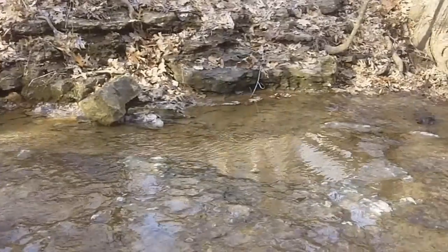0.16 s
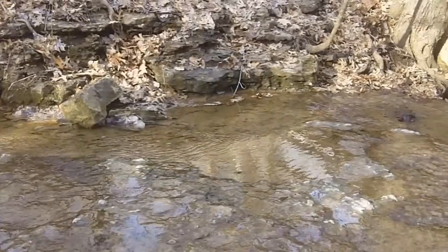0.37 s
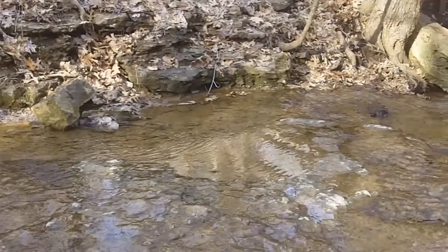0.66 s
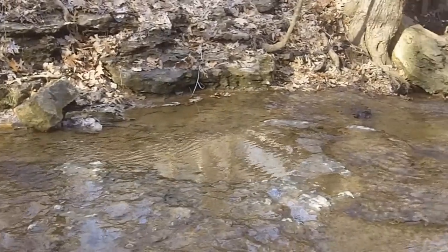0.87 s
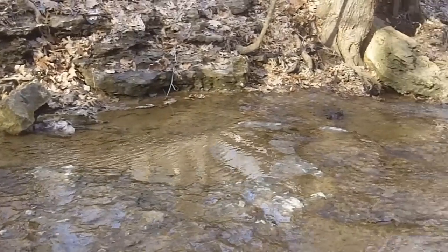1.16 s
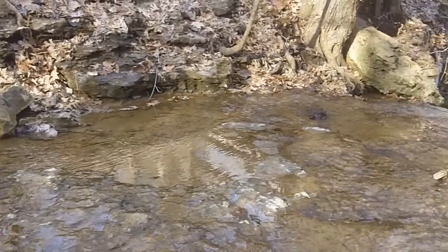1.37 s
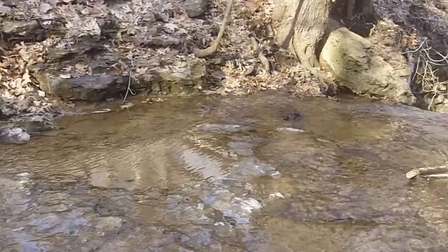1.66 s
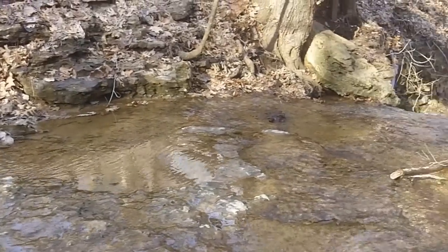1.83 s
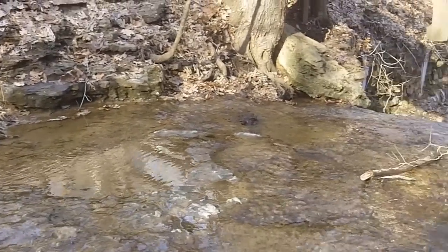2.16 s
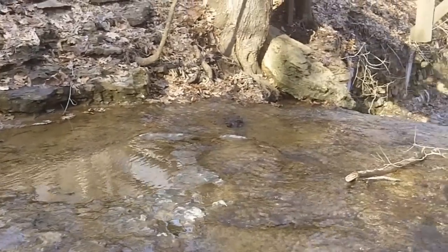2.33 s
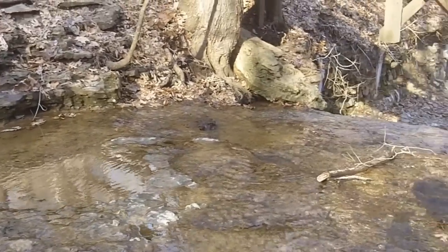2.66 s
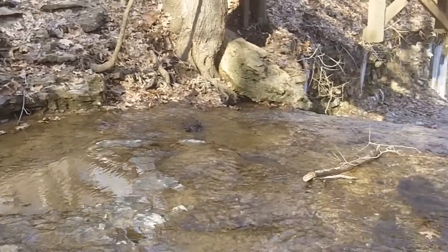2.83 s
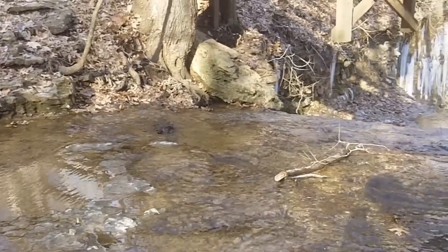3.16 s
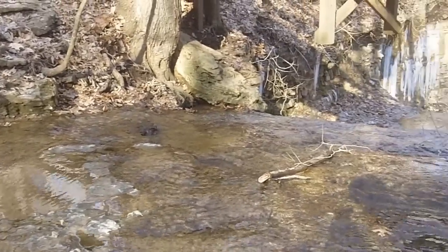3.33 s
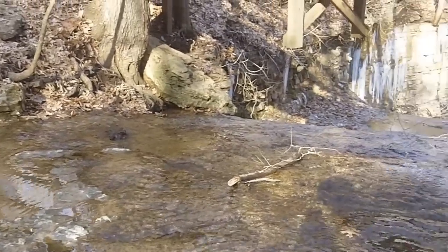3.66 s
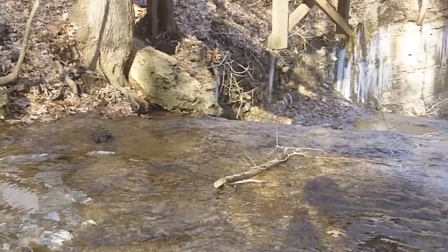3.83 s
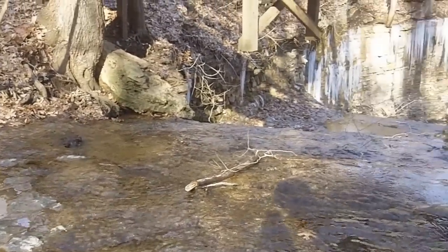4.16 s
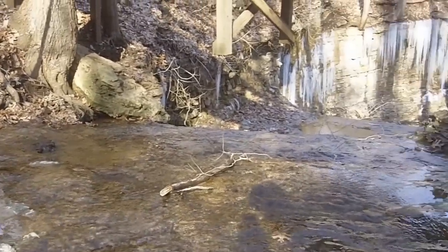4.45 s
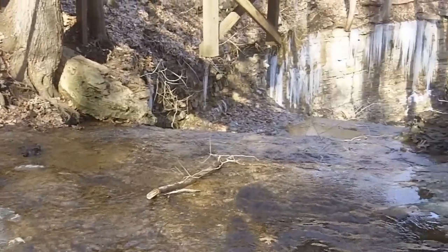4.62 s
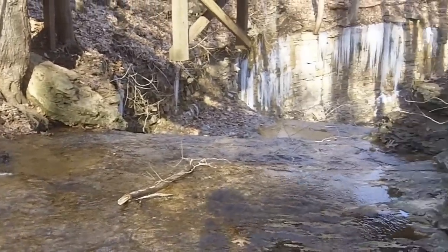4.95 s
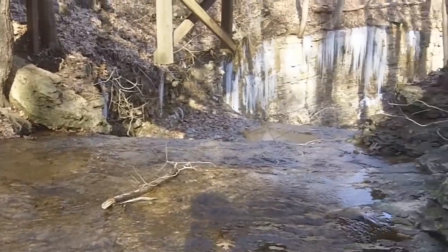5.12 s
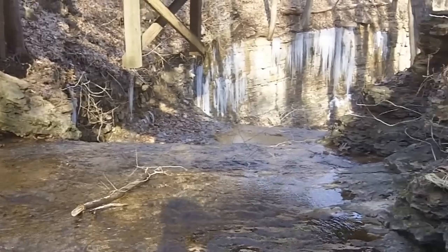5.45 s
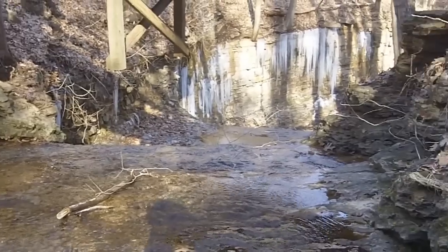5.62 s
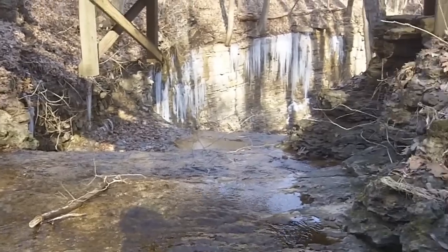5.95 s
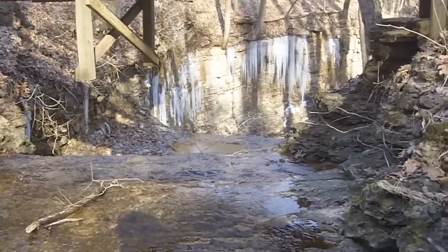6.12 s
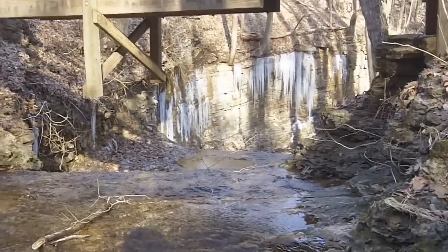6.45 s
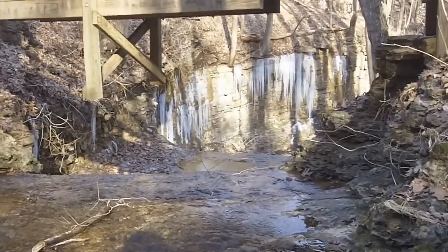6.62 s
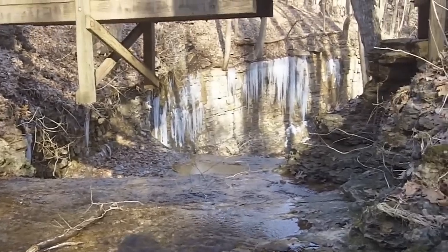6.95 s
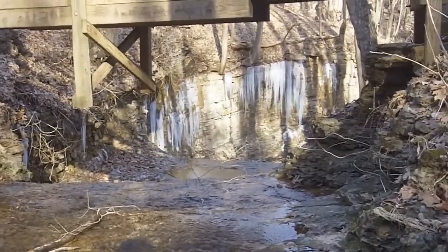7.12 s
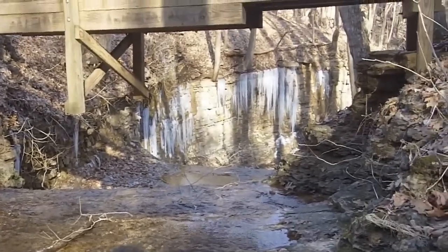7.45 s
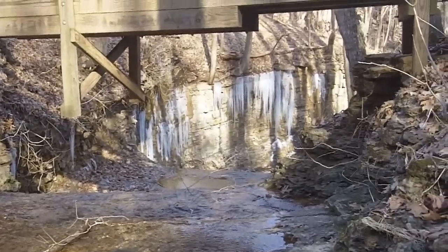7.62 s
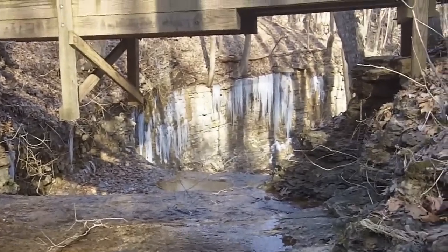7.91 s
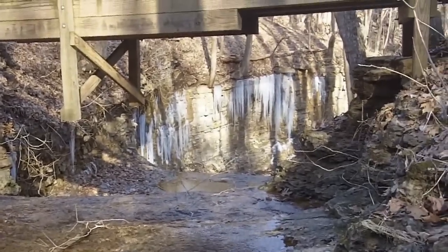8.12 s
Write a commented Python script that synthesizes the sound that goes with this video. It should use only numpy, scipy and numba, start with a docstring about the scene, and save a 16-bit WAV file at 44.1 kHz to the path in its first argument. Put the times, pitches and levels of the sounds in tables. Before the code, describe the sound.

Close, bright trickling and gurgling of a shallow stream over stones continues throughout, dotted with little plops and drips against a soft wash of water. Light wind rumbles on the microphone, held outdoors at the water's edge. Before the middle, a hand rubs and bumps the camera softly, with a single click among the knocks. The gurgle thins slightly and the babbling carries on unchanged.

```python
"""On the bank of a shallow creek that runs over rock ledges, heard through a hand-held camera.
Thousands of trapped air bubbles ring as damped oscillators over the even rush of the water
further off; spray ticks close by. Moving air rumbles on the microphone, and the camera body,
set vibrating by the hand, knocks softly and clicks once as it is turned."""
import sys
import numpy as np
from scipy import signal
from scipy.fft import rfft, next_fast_len
from scipy.io import wavfile
from scipy.ndimage import map_coordinates
from numba import njit

SR = 44100
rng = np.random.default_rng(int(sys.argv[2]) if len(sys.argv) > 2 else 0)


def output_pcm(signal):
    """Save a mono or channel-first signal as 16-bit PCM at the path in sys.argv[1].

    Samples are clipped to [-1, 1] before scaling.
    """
    pcm = np.clip(np.atleast_2d(signal).T, -1, 1) * 32767
    wavfile.write(sys.argv[1], SR, np.round(pcm).astype(np.int16))


N = 365009
T = np.arange(N) / SR
TURN_S = (2.34, 3.11)  # start and end of the camera's turn away from the near riffle


def babble(count, spread_db, cycles, glide, burst_s, burst_db):
    """Minnaert resonance: each folding wavelet traps a few bubbles, and the smaller ones ring higher."""
    # Loudness by bubble size. Each row: pitch in Hz, relative level in dB.
    sizes = [(330, -36), (440, -7), (600, -4), (1000, -2), (1800, 1), (2500, -0.5), (3600, 1), (4800, -0.5),
             (7500, -8.5)]
    # The babble varies as the camera faces the distant water. Each row: time in seconds, gain in dB.
    facing = [(0, 1.3), (4.5, 2.5), (6, 0.5), (8.28, 1.1)]
    per_wavelet, lowest_hz, highest_hz = 6, sizes[0][0], sizes[-1][0]
    fold_s, strength = rng.random(count) * N / SR, rng.standard_normal(count)
    delay, pitch, near, life, rise = rng.random((count * per_wavelet, 5)).T
    start = fold_s.repeat(per_wavelet) + burst_s * delay
    hz = lowest_hz + (highest_hz - lowest_hz) * pitch ** 1.9
    nearness = np.minimum(-np.log(1 - near), 3.5)  # a few are much nearer than the rest
    wavelet_db = burst_db * np.tanh(strength).repeat(per_wavelet)
    peak = gain_at(sizes, hz) * undb(spread_db * nearness + wavelet_db)
    ring_cycles = cycles * np.sqrt(hz / 1000) * (.5 + life)  # small bubbles ring for more cycles
    bubbles = ring(start, peak, hz, ring_cycles, glide * (rise - .2), swell=.47)
    return level(bubbles, -40) * envelope(facing)


def plops(gain_db, glide):
    """Free oscillation: single near bubbles stand out, each with a rounded start and an upward chirp."""
    # Each row: start in seconds, relative peak level in dB, pitch in Hz, ring length in cycles.
    nearest_bubbles = [(0.064, -31, 1210, 30), (0.1012, -26.5, 2600, 40), (0.133, -30, 1440, 45),
                       (0.196, -33, 626, 25), (0.4835, -22, 3340, 12), (0.517, -31, 1020, 35),
                       (0.581, -26, 3650, 18), (0.624, -30, 1060, 22), (0.829, -30, 1490, 75),
                       (1.0139, -30.0, 2220, 60), (1.082, -22, 960, 34), (1.1972, -27, 2660, 18),
                       (1.21, -29.5, 985, 30), (1.6463, -26.5, 1060, 40), (1.6836, -28.5, 1620, 55),
                       (1.864, -33, 1165, 35), (2.034, -33, 1440, 35), (2.047, -33, 1010, 40),
                       (2.103, -27, 3260, 18), (2.2259, -23, 1890, 11), (2.413, -31.5, 540, 29),
                       (2.5592, -26.0, 3050, 27), (2.611, -28.5, 1680, 40), (2.652, -29, 1450, 42),
                       (2.784, -26, 3100, 14), (2.7973, -23, 2910, 8.7), (2.957, -29.5, 1290, 50),
                       (3.3043, -28, 3080, 40), (3.3811, -23, 3830, 13), (3.3845, -19, 1500, 8.4),
                       (3.4158, -20, 3920, 18), (3.4447, -26.5, 1580, 16), (4.004, -30, 565, 32),
                       (4.1034, -25, 4840, 37), (4.1229, -23, 4900, 27), (4.2231, -28.5, 2740, 45),
                       (4.2239, -22, 4960, 15), (4.3116, -27.5, 2850, 65), (4.4514, -28, 4880, 12),
                       (4.534, -30, 870, 28), (4.581, -30.0, 2760, 51), (4.6463, -28, 1130, 27),
                       (4.8748, -25.5, 1120, 27), (4.893, -23.5, 3970, 8), (4.9566, -31, 437, 7.8),
                       (4.9965, -28.5, 2600, 40), (5.502, -27, 3220, 40), (5.5034, -29.0, 2000, 71),
                       (5.88, -29, 1320, 33), (6.272, -31, 980, 30), (6.3995, -24.5, 4290, 37),
                       (6.408, -25.5, 1470, 12), (6.4966, -29, 4810, 27), (6.9228, -21.5, 2350, 24),
                       (7.0979, -25.5, 3740, 12), (7.5426, -25, 4900, 40), (7.6278, -31.5, 976, 44),
                       (7.9408, -27, 935, 35), (7.9874, -28, 4700, 40), (8.0033, -26, 4700, 18),
                       (8.0863, -25, 4700, 18), (8.1548, -24, 1220, 40)]
    start, db, hz, cycles = np.array(nearest_bubbles, float).T.copy()
    return ring(start, undb(db + gain_db), hz, cycles, np.full(len(start), glide), swell=1.2)


def gurgle(count, cycles):
    """Size sets resonance: each hollow between stones traps like-sized bubbles, so keeps near one pitch."""
    # Each row: pitch in Hz, pitch scatter as a fraction, levels in dB before and after the turn.
    hollows = [(666, 0.04, -50.5, -70), (1072.6, .09, -51.5, -51), (1693, .07, -54.5, -65)]
    out = np.zeros(N)
    for centre_hz, scatter, ahead_db, away_db in hollows:
        start = rng.random(count) * N / SR
        hz = centre_hz * np.exp(scatter * rng.standard_normal(count))
        peak = .3 + rng.random(count) ** 2
        ring_cycles = np.full(count, cycles * np.sqrt(centre_hz / 1000))
        glugs = ring(start, peak, hz, ring_cycles, glide=np.full(count, .08), swell=.6)
        out += level(glugs, np.interp(T, TURN_S, [ahead_db, away_db]))
    return out


def spray(count, ahead_db, away_db, spread_db, close_db, close_hz, close_cycles):
    """Drop impact: brief, high ticks on the surface, as a few close drops and a fine patter."""
    # The closest drops. Each row: start in seconds, relative peak level in dB.
    drops = [(.4100, -30), (.4716, -30), (1.2520, -31), (1.7732, -29), (2.194, -26), (2.568, -30),
             (2.7062, -23), (2.7835, -32), (2.8740, -28), (2.9577, -31), (3.0784, -30), (3.4158, -34),
             (3.8625, -28.5), (3.9551, -31.5), (4.5661, -29.5), (5.2271, -35), (5.9045, -31), (6.1412, -33),
             (6.1845, -34), (6.5845, -32), (6.6731, -34), (7.3338, -29.5), (7.6374, -28.5), (7.9820, -26.5),
             (8.0022, -30), (8.0122, -34)]
    when, pitch, near, life = rng.random((count, 4)).T
    peak = undb(spread_db * np.minimum(-np.log(1 - near), 3))
    patter = ring(when * N / SR, peak, 3600 + 3900 * pitch, 10 + 22 * life, np.zeros(count), swell=.8)
    start, db = np.array(drops, float).T.copy()
    hz = close_hz * (1 + .04 * rng.standard_normal(len(drops)))
    cycles = np.full(len(drops), close_cycles)
    close = ring(start, undb(db + close_db), hz, cycles, glide=np.zeros(len(drops)), swell=1.2)
    return close + level(patter, np.interp(T, TURN_S, [ahead_db, away_db]))


def rush():
    """Incoherent summation: distant bubbles, too many to tell apart, merge into gently surging noise."""
    # Each row: frequency in Hz, relative spectral density in dB.
    spectrum = [(100, -4.5), (200, -2), (330, 1), (450, -0.5), (620, 3), (1000, 1.5), (1800, 3),
                (2500, 0.5), (3600, 1), (4700, -2), (6500, -7), (7500, -14)]
    return noise(spectrum) * undb(-36.5 + .31 * walk(rate_hz=14))


def ledges(sound, wet_db, t60):
    """Diffuse reflection: the rock banks scatter each sound back as a short, dense tail."""
    t = T[:SR // 4]
    tail = rng.standard_normal(len(t)) * np.exp(-np.log(1000) * t / t60) * (t > .004)
    return sound + undb(wet_db) * signal.oaconvolve(sound, tail / np.linalg.norm(tail))[:N]


def knocks(push_db, body_db):
    """Elastic rebound: each push of the hand dents the casing, and the body springs back with a thud."""
    # Each row: time in seconds, relative level in dB, contact time in seconds.
    pushes = [(2.373, -27.5, .0014), (2.444, -28, 0.0021), (2.8525, -20, 0.0011), (2.8846, -18.5, 0.00079),
              (2.8945, -11, 0.00048), (2.912, -19, 0.0024), (2.9475, -22.5, 0.0014),
              (3.1051, -15.5, 0.00095), (3.14, -22, 0.00064), (3.4972, -12, 0.00039),
              (3.507, -21.5, 0.00049), (3.5144, -13.5, 0.00054), (3.658, -22, 0.0012),
              (3.7301, -23.5, 0.00081), (3.866, -20.5, 0.001), (4.0590, -12.5, 0.00039),
              (4.1293, -15.5, 0.00067), (4.6324, -16.5, 0.0009), (4.6729, -15.5, .0007),
              (4.8485, -13.5, 0.00047)]
    # Modes of the held camera. Each row: frequency in Hz, 60 dB decay time in seconds, relative dB.
    body_modes = [(66, 0.056, -9.5), (141.5, 0.024, -3), (342, 0.0086, -8.5), (950, 0.0012, -14)]
    rebound = undb(body_db) * impulse_response(body_modes)
    t = T[:len(rebound)]
    out = np.zeros(N)
    for s, db, contact_s in pushes:
        dent = undb(push_db) * np.exp(-2 * np.abs(t / contact_s - 3))
        thud = np.pad(rebound, (int(3.7 * contact_s * SR), 0))[:len(t)]
        first = int((s - 3 * contact_s) * SR)  # the dent is deepest at time s
        out[first:first + len(t)] += undb(db) * (thud - dent)
    return out


def click(gain_db):
    """Impulse excitation: the casing chatters as it seats, and each hard contact rings its modes."""
    # Each row: time in seconds, relative level in dB.
    contacts = [(4.2355, -5.5), (4.2361, -7), (4.2367, -7.5), (4.2373, -12), (4.2380, -12)]
    # Each row: frequency in Hz, 60 dB decay time in seconds, relative level in dB.
    casing_modes = [(1670, 0.006, -13.5), (2630, 0.0069, -7), (3600, 0.0062, -13), (4520, 0.0062, -4),
                    (5830, 0.012, -8), (7350, 0.0066, -6.5)]
    blows = np.zeros(N)
    for s, db in contacts:
        blows[int(s * SR)] += undb(db + gain_db)
    return signal.oaconvolve(blows, impulse_response(casing_modes))[:N]


def grip():
    """Friction noise: the hand shifts on the camera body with a dull rub as the turn begins."""
    # Each row: frequency in Hz, relative spectral density in dB.
    spectrum = [(50, -12), (100, -3), (135, 3.5), (180, -9.5), (300, -24.5), (800, -59.5)]
    # Each row: time in seconds, level in dB.
    rub_levels = [(1.7, -71), (2.1, -50), (2.9, -47.5), (3.3, -71.5)]
    return noise(spectrum) * envelope(rub_levels)


def air():
    """Pressure fluctuation: air moving over the microphone rumbles, more so as the camera swings."""
    # Each row: frequency in Hz, relative spectral density in dB.
    spectrum = [(5, -12), (11, -1), (20, -3.5), (28, -7), (40, -7.3), (62, -10.5), (85, -17.2),
                (120, -23.5), (180, -31), (300, -43), (600, -65)]
    # Each row: time in seconds, gain in dB.
    swells = [(0, -.6), (2, -.3), (2.7, .3), (2.9, 4), (3.2, -.3), (4.2, -.3), (4.7, 1.5), (5.3, 1.5),
              (6.3, .3), (6.8, -1), (7.4, -.3), (8.28, -.3)]
    return undb(-31.7) * noise(spectrum) * envelope(swells)


def width():
    """Decorrelation: faint noise, opposite in sign left and right, widens the lows."""
    # Each row: frequency in Hz, relative spectral density in dB.
    spectrum = [(5, 3), (20, 2), (45, 13.5), (80, 12.5), (150, -9.5), (350, -11.5), (750, -21),
                (1050, -54.5), (3000, -58.5), (7000, -50.5)]
    return level(noise(spectrum), -52) * np.array([[1], [-1]])


@njit
def ring(start, peak, hz, cycles, glide, swell):
    """Damped oscillation: each ring builds over `swell` cycles and dies by about 50 dB in `cycles`."""
    out = np.zeros(N)
    for k in range(len(start)):
        first, length = int(start[k] * SR), int(cycles[k] * SR / hz[k]) + 2
        omega = 2 * np.pi * hz[k] / SR
        ratio = swell * np.log(300) / cycles[k]  # attack time over decay time
        crest = (ratio / (1 + ratio)) ** ratio / (1 + ratio)  # maximum of the unscaled envelope
        phasor = peak[k] / crest + 0j
        step = np.exp(1j * omega - np.log(300) / length)
        bend = np.exp(1j * omega * glide[k] / length)  # pitch shifts by the fraction `glide` in all
        shut, opening = 1., np.exp(-hz[k] / SR / swell)
        for i in range(max(first, 0), min(first + length, N)):
            out[i] += phasor.imag * (1 - shut)
            phasor, step, shut = phasor * step, step * bend, shut * opening
    return out


def impulse_response(modes):
    """Modal superposition: a struck body sounds as a sum of decaying sines."""
    t = T[:SR // 10]
    return sum(undb(db) * np.sin(2 * np.pi * hz * t) * np.exp(-np.log(1000) * t / t60)
               for hz, t60, db in modes)


def noise(spectrum):
    """Spectral shaping: white noise takes the given colour, at rms 1."""
    size = next_fast_len(N)
    white = rfft(rng.standard_normal(size))
    gains = gain_at(spectrum, np.fft.rfftfreq(size, 1 / SR))
    return level(np.fft.irfft(white * gains, size)[:N], 0)


def walk(rate_hz):
    """Slow random modulation: a spline through random values, with a spread near 1."""
    position = np.arange(N // 64 + 1) * 64 / SR * rate_hz
    return map_coordinates(rng.standard_normal(4096), [position], order=3, mode="wrap").repeat(64)[:N]


def gain_at(spectrum, hz):
    """Gain of a spectrum, interpolated in dB over log frequency."""
    knots_hz, db = np.transpose(spectrum)
    return undb(np.interp(np.log(np.maximum(hz, 1)), np.log(knots_hz), db))


def envelope(points):
    """Gain over time, interpolated in dB."""
    return undb(np.interp(T, *np.transpose(points)))


def level(x, db):
    """Normalise to rms 1, then apply a gain in dB."""
    return x * undb(db) / np.std(x)


def undb(db):
    """Decibels to amplitude ratio."""
    return 10 ** (np.asarray(db) / 20)


def scene():
    """Superposition: water, air and handling add in the centre; only the lows are a little wide."""
    near = babble(count=1300, spread_db=1.5, cycles=42.6, glide=.17, burst_s=.035, burst_db=2)
    water = ledges(near, wet_db=-13, t60=.08) + plops(gain_db=.5, glide=.04) + rush()
    water += gurgle(count=420, cycles=110)
    water += spray(count=1100, ahead_db=-50.5, away_db=-54, spread_db=3,
                   close_db=5.5, close_hz=6600, close_cycles=12.)
    camera = air() + grip() + knocks(push_db=3, body_db=1) + click(gain_db=-4.5)
    return water + camera + width()


def record(dry):
    """Frequency response: the camera has a narrow notch in the treble and a steep low-pass cut-off."""
    notch_hz, cutoff_hz = 5470, 7500
    notched = signal.lfilter(*signal.iirnotch(notch_hz, Q=5.5, fs=SR), dry)
    return signal.sosfilt(signal.ellip(10, .3, 60, cutoff_hz, fs=SR, output="sos"), notched)


dry = scene()
out = record(dry)
output_pcm(out)
```